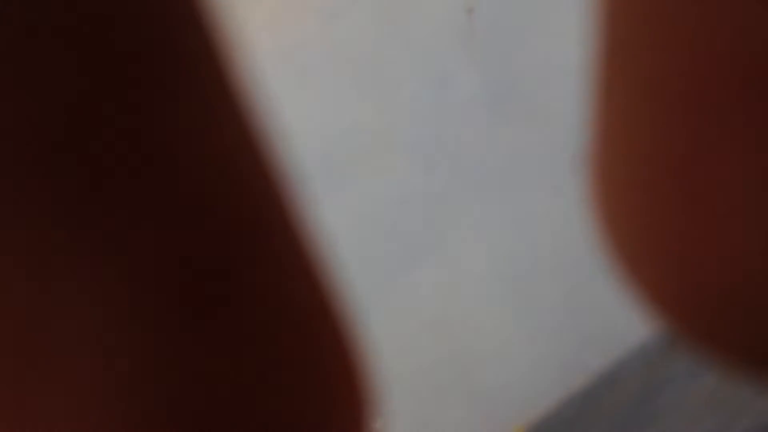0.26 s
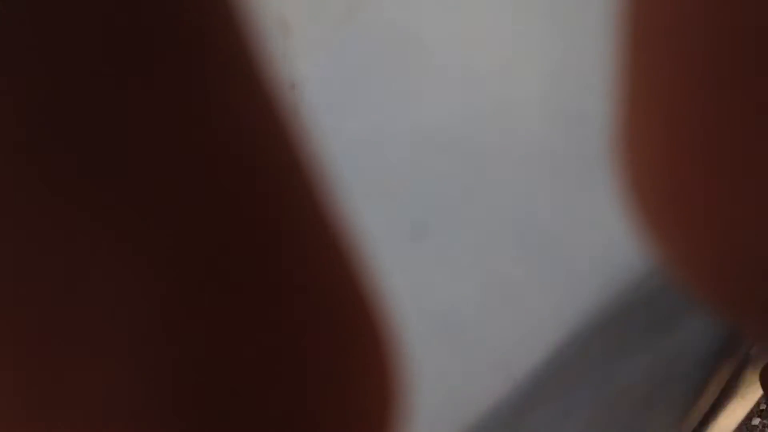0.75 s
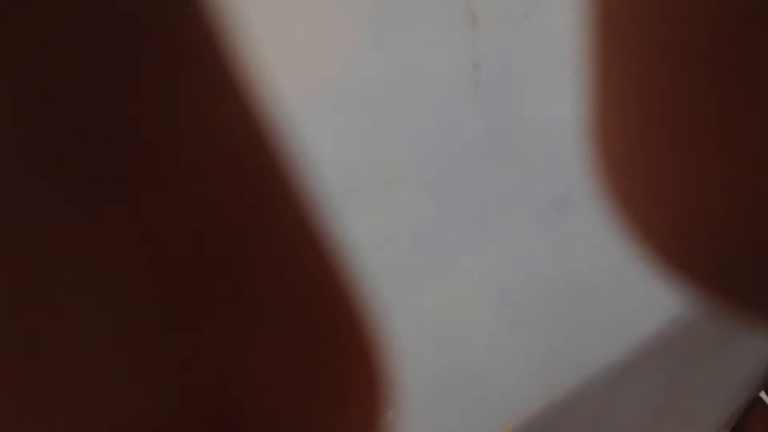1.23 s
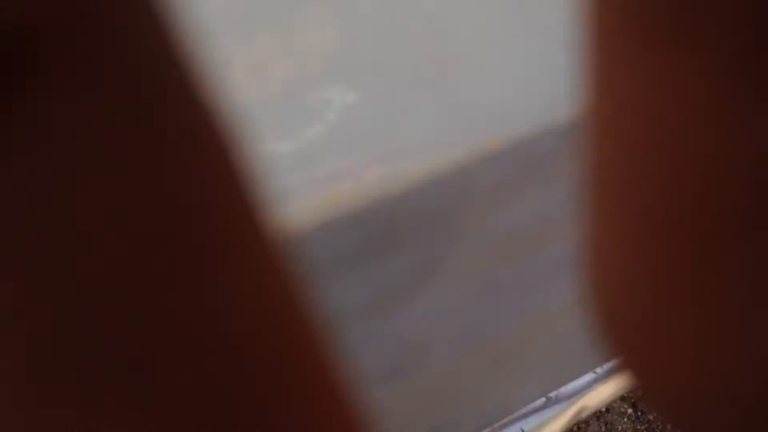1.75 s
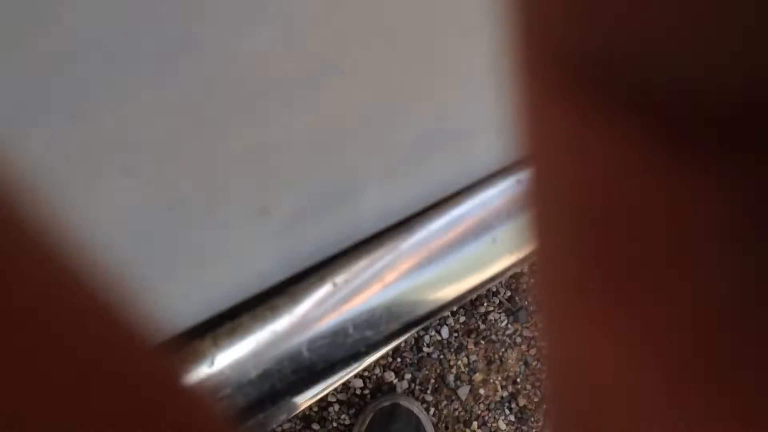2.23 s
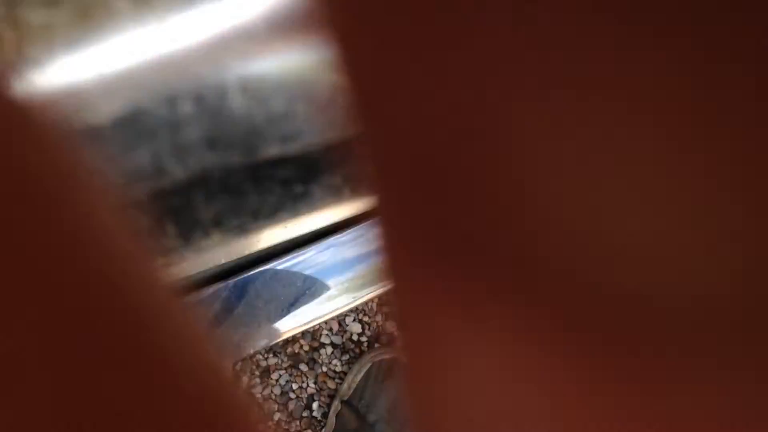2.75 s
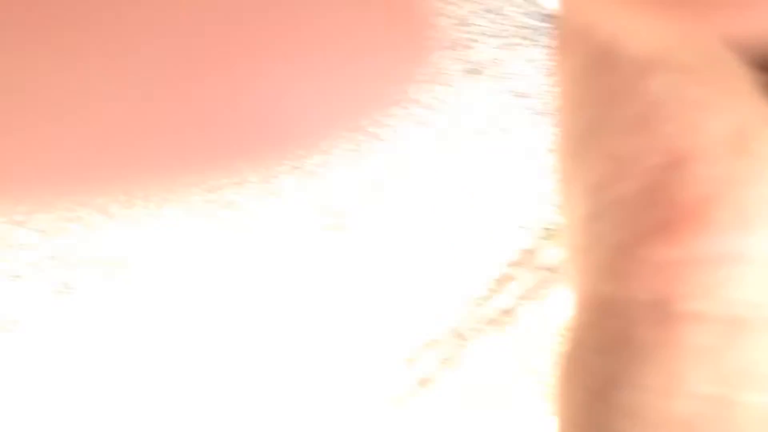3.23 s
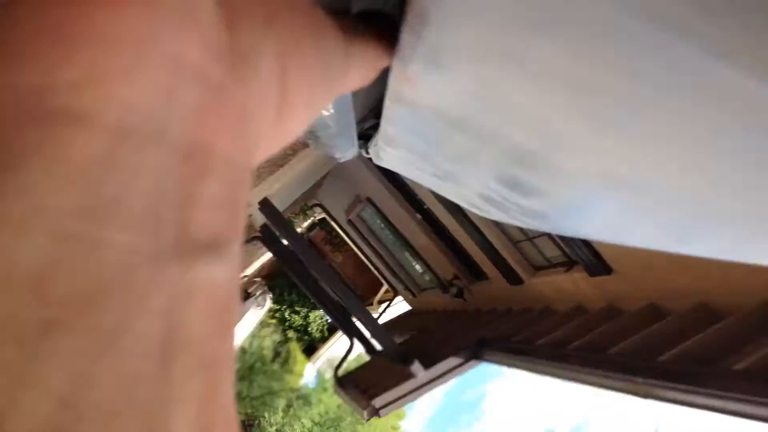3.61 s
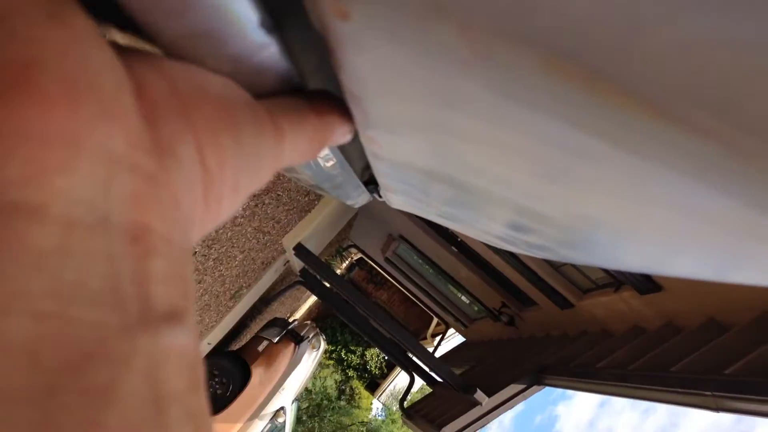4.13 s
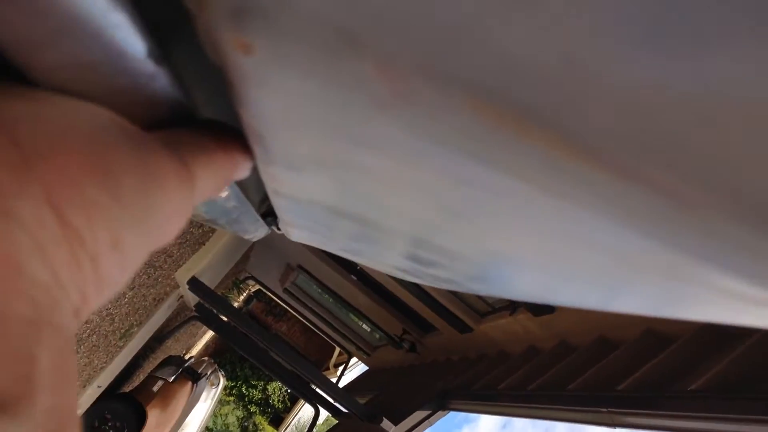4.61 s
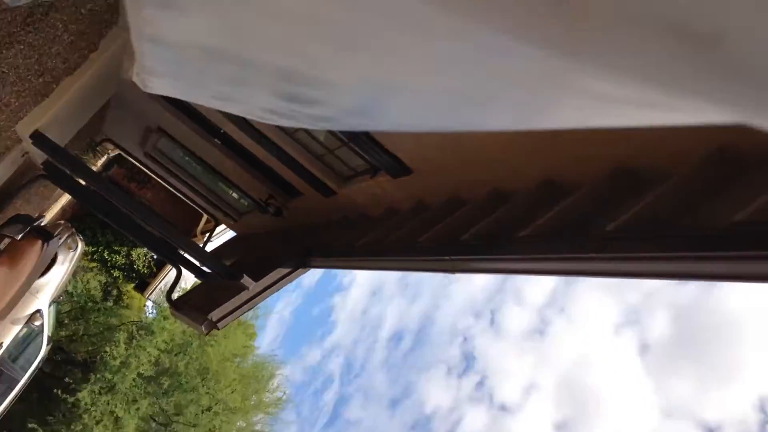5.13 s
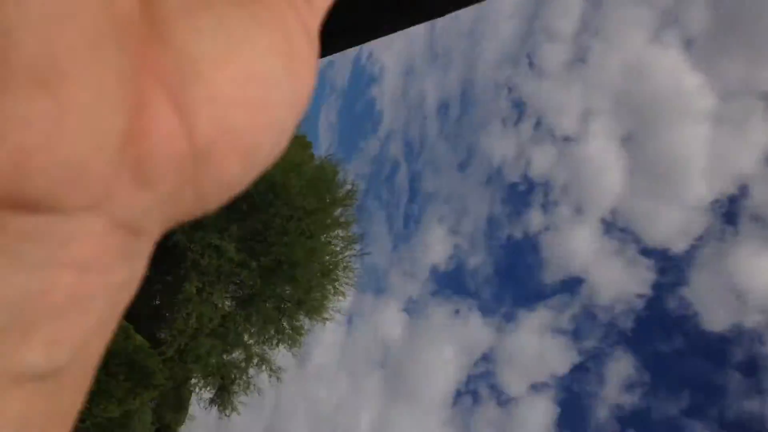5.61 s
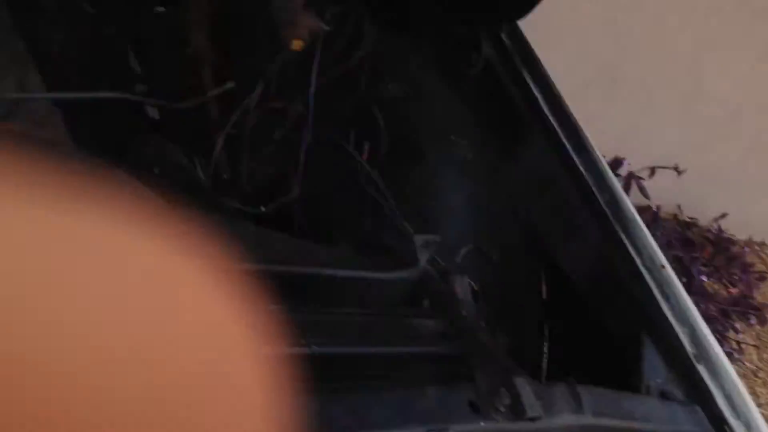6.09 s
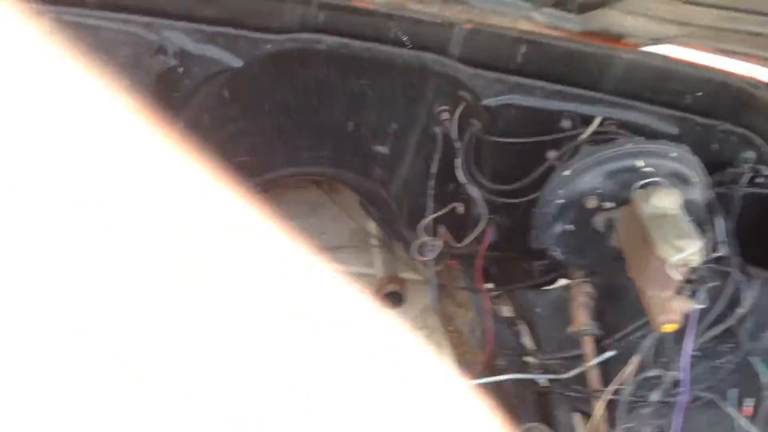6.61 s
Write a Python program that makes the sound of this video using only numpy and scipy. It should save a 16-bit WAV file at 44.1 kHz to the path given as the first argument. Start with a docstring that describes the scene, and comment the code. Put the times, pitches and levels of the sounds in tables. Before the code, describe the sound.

Outdoors, close and dry: fingers rub and scrape on sheet steel while small latch parts tick. One deep double bang shakes the panel early, then comes a calmer stretch of soft rubbing and dull ticks. After the middle, hard metallic cracks, short creaks and resonant booms come irregularly, strongest late as the hood swings up. Rattles and a low throbbing hum fade over a quiet yard rumble and slight hiss.

```python
"""Truck hood and latch

A hand works the latch of a sheet-steel truck hood in a gravel yard, then swings the hood open.
Blows feed a crowd of dense modes, as decaying noise, and low modes, as beating tones: the panel booms.
Hard pushes are tones that fall in pitch, soft landings swelling low tones; small parts tick, snap and ping.
Scrapes and rustle are filtered, grainy noise. An outdoor rumble and microphone hiss lie under all of it."""
import sys
import numpy as np
from scipy import signal
from scipy.fft import rfft, irfft, next_fast_len
from scipy.io import wavfile
from scipy.ndimage import map_coordinates

SR = 44100
rng = np.random.default_rng(int(sys.argv[2]) if len(sys.argv) > 2 else 0)


def put_to_file(sound):
    """Save the sound as 16-bit audio at rate SR, in the file named by the first command-line argument."""
    columns = np.atleast_2d(sound).T  # one column per channel
    safe = np.clip(columns, -1, 1)
    whole_steps = np.round(safe * 32767)
    wavfile.write(sys.argv[1], SR, whole_steps.astype(np.int16))


N = 302123  # length in samples

# blows and short scrapes on the hood: start_s, heave_db (whole hood), boom_db (panel), clang_db (metal contact),
# hardness_db_per_octave (extra treble tilt), contact_s, ring (0-1, scales the decay times)
BLOWS = [(.381, -45, -107, -40.5, 4, 0.005, 0.54), (0.551, -25.5, -24.5, -42, 8, 0.0049, 0.8),
         (0.651, -74, -39, -43, 1, 0.049, 0.92), (0.716, -22, -33.5, -64, -2, 0.0081, 0.68),
         (1.132, -40, -39, -54, 0.5, 0.041, 0.9), (1.174, -16, -11.5, -27.5, -1, 0.0042, 0.63),
         (1.184, -2, -14, -20.5, 1, 0.013, 0.55), (1.272, -34, -21, -51, -13, 0.0086, 0.59),
         (1.535, -13.5, -50, -68, -10.5, 0.02, 0.1), (1.709, -53, -49, -47.5, 2.5, 0.015, 0.42),
         (1.864, -22.5, -38, -51, 1.5, 0.007, 1), (1.964, -37, -40, -52, 6.5, 0.0041, .99),
         (3.439, -34.5, -21, -44, 0.5, 0.064, 0.56), (3.463, -39.5, -13, -27, -2.5, 0.015, 0.62),
         (3.585, -73.5, -22, -48.5, -6.5, 0.028, 0.6), (3.712, -47, -21, -43.5, -9, 0.0097, 0.74),
         (3.983, -75.5, -28, -39.5, 3.5, 0.015, 0.48), (4.088, -80.5, -35.5, -46.5, 2.5, 0.0076, 0.8),
         (4.243, -30.5, -18, -43.5, 2.4, 0.0077, 1), (4.576, -61.5, -38, -38.5, 5, 0.0063, 0.97),
         (4.8117, -12, -14.5, -34.5, 0.5, 0.017, 1), (4.885, -47, -14, -36.5, -10.5, 0.049, 0.48),
         (4.949, -35.5, -12, -52, -23.5, 0.0043, 0.64), (5.152, -49, -34.5, -38, -4, 0.0034, 0.9),
         (5.357, -26.5, -15, -40, -1.5, 0.011, 0.9), (5.369, -17, -3.5, -21.5, 0.5, 0.03, 1),
         (5.431, -23, -10.5, -35, 4, 0.0079, 1), (5.568, -19.5, -8.5, -41.5, -2.5, 0.0025, 0.45),
         (5.669, -40, -21, -69, 10, 0.0031, 0.45), (6.011, -41, -50, -58.5, -0.5, 0.018, 1),
         (6.078, -58.5, -30.5, -59, 2, 0.012, 0.4)]
# low panel modes: pitch_hz, level_db (over the blow's colour), t60_s (at ring 1)
PANEL_MODES = [(73.4, 0, 0.86), (111.3, -13, 0.8), (136.3, 7.5, 0.5), (159.1, 8, 0.8), (183.7, -5.5, 1.3),
               (210.2, 3, 0.93), (225.3, -3, 0.81), (260, 0.5, 0.79), (274, -7, 0.49), (307.3, -3, 0.83),
               (353.6, -2, 1.02), (378.7, -1, 0.51), (418, 1, 0.47), (457.3, -5.5, 0.33), (516, -3, 0.61),
               (651, -7.5, 0.27)]
# stiffer upper modes: centre_hz, width_hz (before blur), level_db (before random spread)
RIBS = [(649.4, 1.5, 1.5), (806, 17, -5), (879.4, 6.1, 1.5), (996, 13, -7.5), (1055, 11, -4.5),
        (1153, 13, -7.5), (1288, 6.9, -1), (1516, 24, -1), (1716, 11, 2), (1950, 92, -0.5), (2192, 63, 2.5),
        (2450, 48, -2.5), (2510, 18, -5.5), (2727, 21, -1), (3023, 57, -4.5), (3334, 45, -2.5),
        (3650, 23, -2), (4100, 230, -9), (4476, 66, -5.5), (5320, 130, -10.5)]
# how fast the dense modes die: freq_hz, t60_s (slow decay at ring 1)
DAMPING = [(50, 0.2), (130, 2.7), (350, 1.11), (920, 0.49), (2400, 0.51), (6400, 0.26), (14000, 0.085)]
# colour of a contact of average hardness: freq_hz, level_db (over the clang)
CLANG = [(1050, 7), (2700, -1.06), (7000, -9)]
# colour between the parts of a blow: freq_hz, boom_share (0-1), offset_db
BETWEEN = [(136.6, 0.64, -3.5), (460.5, 0.61, -1), (690, 0.31, -1)]
# small parts tick: start_s, level_db (before the rise), pitch_hz
TICKS = [(.008, -35, 1350), (.045, -34, 1320), (.071, -32, 1670), (.105, -39, 1370), (.196, -39, 1510),
         (0.219, -37.5, 1640), (.906, -34.5, 1737), (0.929, -36.5, 1730), (0.957, -31, 1040),
         (1.029, -31.5, 1548), (1.494, -44, 1780), (1.531, -38, 1489), (1.847, -46, 1400),
         (1.862, -34.5, 2150), (2.043, -34, 1700), (2.174, -42, 1210), (2.496, -31.5, 1200),
         (2.588, -45, 1250), (2.618, -23, 1170), (2.667, -22.5, 1170), (2.966, -36.5, 1270),
         (3.864, -33, 1360)]
# a small loose metal part jingles: start_s, level_db (before the rise), pitch_hz
PINGS = [(1.96, -59, 7000), (1.967, -71, 5780), (1.978, -63, 6950), (2.038, -61, 8700), (2.04, -62, 6600),
         (2.048, -53, 5800), (2.08, -62, 6600), (2.15, -60, 8650), (2.238, -61, 8740), (2.385, -52, 2880)]
# bright snaps of bare steel: start_s, level_db (before the filter), centre_hz
SNAPS = [(.5512, -30, 4500), (3.465, -25.5, 5500), (3.9582, -19, 5290), (4.2505, -29, 3800),
         (4.5787, -27.5, 7000), (5.154, -33, 3000), (5.3688, -23, 5930)]
# the panel lands softly on a rubber stop: start_s, peak_db, pitch_hz
THUNKS = [(0.552, -15.5, 216), (1.183, -5, 223), (1.1955, -12, 235), (1.277, -12, 120),
          (4.2481, -11.5, 247), (4.953, -11, 299), (5.365, -2.5, 180), (5.379, -6, 386),
          (5.565, -11.5, 237)]
# hard pushes as the latch seats: start_s, level_db, pitch_hz (near the start), t60_s (of the tone), lowpass_hz
KNOCKS = [(1.1745, -16, 520, .03, 2500), (3.4648, 0, 850, .022, 7000), (3.7128, -5, 680, .045, 2300),
          (5.4335, -3, 380, .025, 2500)]
# fingers slip: start_s, level_db, centre_hz, length_s (of the fade)
BRUSHES = [(0.642, -54, 7500, 0.03), (0.785, -57, 10500, 0.078), (0.854, -60, 9880, 0.063),
           (.92, -61, 11550, 0.038), (2.034, -55, 2960, 0.047), (2.318, -56, 2780, 0.1),
           (2.941, -57, 2320, 0.21), (3.162, -60.5, 4000, 0.049), (3.278, -56.5, 2500, 0.14),
           (3.587, -53, 5000, 0.039), (4.015, -58.5, 6500, 0.088), (5.887, -59, 5300, 0.049),
           (6.048, -56.5, 2930, 0.029), (6.1574, -57.5, 3090, 0.043), (6.311, -64.5, 4350, 0.08),
           (6.528, -66, 3180, 0.11)]
# latch steel squeaks and scrapes as it slides: start_s, end_s, centre_hz, width_hz, level_db (before the fade)
CREAKS = [(0.553, 0.575, 1650, 280, -34), (.551, .58, 3070, 1300, -31.5), (.565, 0.641, 3100, 890, -40.5),
          (.655, .69, 3900, 360, -51), (.57, .64, 1250, 1200, -42), (.551, .59, 4800, 690, -44.5),
          (.64, .7, 1450, 1200, -49), (.655, .69, 2800, 110, -44), (.712, .75, 2550, 34, -50.5),
          (1.185, 1.33, 2870, 1700, -37), (1.178, 1.31, 439, 80, -22.5), (3.985, 4.045, 1530, 400, -39.5),
          (3.985, 4.045, 730, 320, -38), (3.985, 4.06, 4300, 1200, -51.5), (4.08, 4.15, 2650, 1300, -55.5),
          (4.882, 5.0, 1330, 280, -29), (4.886, 4.96, 810, 270, -23), (4.89, 4.985, 2460, 1000, -39.5),
          (4.99, 5.11, 760, 620, -41), (5.18, 5.3, 1080, 470, -41.5), (3.47, 3.58, 2230, 570, -40.5),
          (3.47, 3.52, 4200, 2800, -45), (3.466, 3.55, 830, 560, -36.5), (3.58, 3.66, 1250, 1100, -51),
          (3.435, 3.465, 600, 860, -50), (.65, .73, 1490, 530, -41), (4.05, 4.18, 800, 230, -43.5),
          (5.152, 5.185, 3020, 1100, -40), (3.466, 3.62, 1285, 32, -36), (4.244, 4.32, 980, 300, -37),
          (4.249, 4.31, 3150, 2300, -44), (4.25, 4.36, 250, 93, -29.5), (1.186, 1.22, 1950, 120, -25),
          (4.248, 4.285, 2050, 500, -31), (4.249, 4.285, 4320, 400, -51), (4.27, 4.36, 1620, 1000, -41),
          (4.82, 4.867, 2080, 420, -30.5), (3.962, 3.99, 1300, 1500, -53), (6.404, 6.72, 2020, 600, -67.5),
          (2.15, 2.68, 1050, 130, -59.5), (2.2, 2.45, 3080, 300, -65.5), (1.87, 2.57, 1830, 45, -61.5),
          (0, 0.098, 1470, 620, -52.5), (.53, .556, 1400, 4600, -49.5), (3.714, 3.79, 550, 1800, -46),
          (4.23, 4.25, 2600, 1900, -53.5), (1.128, 1.16, 1440, 270, -49.5)]
# hands and shoes rub: time_s, grit_db, swish_db, hollow_db
RUSTLE = [(0.0, -71, -67, -63.5), (0.44, -67, -67.5, -66), (0.72, -56.5, -65.5, -52.5),
          (1.03, -64, -67, -57.5), (1.26, -74, -67.5, -54.5), (1.72, -69, -67.5, -59.5),
          (2.19, -61, -64.5, -52.5), (2.76, -65, -66.5, -61.5), (3.39, -69.5, -64.5, -61.5),
          (3.64, -57, -59.5, -50), (3.81, -63, -61, -59.5), (4.23, -64, -67, -52), (4.41, -65.5, -65, -53),
          (4.66, -77, -67.5, -64.5), (4.88, -47.5, -59.5, -53), (5.0, -57, -61, -46.5),
          (5.44, -60, -64, -53.5), (5.67, -72.5, -73, -57.5), (6.12, -74.5, -69, -70.5),
          (6.85, -73, -70, -68)]
# spectra of the rustle's hollow, gritty and swishing registers: freq_hz, level_db (per Hz)
HOLLOW = [(300, -16), (700, 4), (1500, 4.5), (2400, -7), (3200, -10), (5000, -29.5)]
GRIT = [(1500, -20), (2600, -6.5), (4200, -1), (6000, -9.5), (9000, -20.5)]
SWISH = [(3500, -23), (6000, -3.5), (9000, -5.5), (14000, -7.5), (16000, -5)]
# spectra of the yard's rumble (before the hood colours it) and of the microphone hiss: freq_hz, level_db (per Hz)
YARD = [(12, -47), (20, -12.5), (54, -1), (118, 2.5), (179, 0), (215, -2), (325, -4.5), (414, -9.5),
        (560, -11.5), (800, -29.5), (1320, -120)]
HISS = [(180, -30), (300, 1), (384, -8.5), (675, -8.5), (1590, -3), (2940, -13), (3640, -10.5),
        (14400, -25), (15600, -29.5)]
# loudness of the yard's rumble, before its lumps: time_s, level_db
HUM = [(0, -56), (.4, -58), (2.8, -50.5), (4.6, -55), (5.3, -41), (5.85, -45.5), (6.2, -50.5), (6.5, -56.5),
       (6.85, -55.5)]

HEAVE_HZ, BOOM_HZ, CLANG_HZ = 70, 240, 2700  # heave and boom are centred here; the treble tilt pivots on the clang
WIDTH = 1.2  # each range of the colour is flat within this factor of its centre
CROWD_DB, TONES_DB = 36.5, -13.5  # dense modes and separate low modes, over the level of the blow
ATTACK_S, ATTACK_SHARE = 0.00086, 0.23  # rise time constant of a blow: this plus this share of its contact
MODE_SPREAD_DB = 2.5  # a low mode's strength varies from blow to blow
TWIN, TWIN_APART = .55, .03  # gain and random detune (share of pitch) of the twin that makes a low mode throb
RIB_SPREAD_DB, RIB_SHIFT = 4, .012  # a rib answers each blow at a new strength and a little off its pitch
# what goes on after a blow: level over the blow, rise time constant, decay
SHAKE_DB, SHAKE_RISE_S, SHAKE_T60_S = -17, 0.072, 1.26  # the truck body
SHAKE_BOOM = 0.17  # the body's drive in dB: this share of the boom, the rest from the heave
SWAY_DB, SWAY_RISE_S, SWAY_T60_S = -20, 0.017, 0.99  # the hood on its hinges, fed by the heave
SWAY_REST_DB = -63  # the sway's steady floor
RATTLE_DB, RATTLE_RISE_S, RATTLE_T60_S = -13.5, 0.019, 0.71  # loose latch parts, fed by the clang
TICK_T60_S, PING_T60_S, THUNK_RISE_S = 0.0098, 0.066, 0.0046
CREAK_SKEW, CREAK_FADE_DB = 0.43, 4  # under 1 a scrape peaks early; it loses this much from start to end
LUMPS_DB, LUMPS_PER_S = 2.2, 12  # uneven swell of the rumble
HISS_DB, TOP_HZ = -67, 15780  # TOP_HZ is the band limit


def amp(db):
    """Gain of a level in dB."""
    return 10 ** (np.asarray(db) / 20)


def unit(x):
    """Scaled to rms 1."""
    return x / np.sqrt(np.mean(x ** 2) + 1e-20)


def along(points, hz):
    """Read a curve of (Hz, value) points on a log frequency axis."""
    f, v = np.transpose(points)
    return np.interp(np.log(hz + 1), np.log(f + 1), v)


def curves(rows):
    """One value per sample for each column after the time."""
    s, *cols = np.transpose(rows)
    return [np.interp(np.arange(N) / SR, s, c) for c in cols]


def wobble(rate):
    """A smooth random curve, rate knots a second."""
    knots = rng.standard_normal(int(N * rate / SR) + 4)
    return map_coordinates(knots, [np.arange(N) * rate / SR])


def chatter(count, rate, spread_db):
    """Random gain of loose parts bouncing, straight lines between rate knots a second."""
    knots = rng.standard_normal(count * rate // SR + 2)
    gain_db = spread_db * np.interp(np.arange(count) * rate / SR, np.arange(len(knots)), knots)
    return unit(amp(gain_db))


def filtered(x, response):
    """x shaped by a response of frequency, with padding for the tail."""
    m = next_fast_len(len(x) + 8192)
    return irfft(rfft(x, m) * response(np.fft.rfftfreq(m, 1 / SR)), m)[:len(x)]


def hump(f, hz, width_hz):
    """Shape of one resonance, 1 at its centre."""
    return 1 / (1 + (2 * (f - hz) / width_hz) ** 2)


def ribs(f, spread_db, blur_hz):
    """The upper modes over a floor, at a new strength and pitch as the grip shifts; a hand on the steel widens them."""
    response = 0.39
    for (hz, width_hz, db), (a, b) in zip(RIBS, rng.standard_normal((len(RIBS), 2))):
        response = response + amp(db + spread_db * a) * hump(f, hz * (1 + RIB_SHIFT * b), width_hz + blur_hz)
    return response


def noise(spectrum, grain_db, steel=False):
    """Coloured noise of rms 1, broken into grains by fast random gain; it may sound through the steel."""
    grains = amp(grain_db * wobble(330)) * rng.standard_normal(N)

    def colour(f):
        body = ribs(f, spread_db=0.5, blur_hz=60) if steel else 1
        return amp(along(spectrum, f)) * body
    return unit(filtered(grains, colour))


def add(track, s, sound):
    """Mix a sound into the track at s seconds."""
    part = track[round(s * SR):][:len(sound)]
    part += sound[:len(part)]


def aftermath(levels_db, rise_s, t60_s):
    """Gain that swells after every blow, scaled by its level, and dies away; overlaps add as power."""
    power, t = np.zeros(N), np.arange(N) / SR
    shape = ((1 - np.exp(-t / rise_s)) * amp(-60 * t / t60_s)) ** 2
    for s, db in zip(np.transpose(BLOWS)[0], levels_db):
        add(power, s, amp(2 * db) * shape)
    return np.sqrt(power)


def yard():
    """Low rumble of the yard and the shaking truck body, in lumps and partly through the hood, over steady hiss."""
    def hood_modes(f):
        return 2.1 + sum(amp(db) * hump(f, hz, width_hz=11.0) for hz, db, _ in PANEL_MODES)
    rumble = unit(filtered(noise(YARD, grain_db=1.0), hood_modes))
    # the heavy body shakes lower than the yard hums
    dark = unit(filtered(rumble, lambda f: hump(f, hz=138, width_hz=640)))
    heave_db, boom_db = np.transpose(BLOWS)[1:3]
    drive_db = SHAKE_BOOM * boom_db + (1 - SHAKE_BOOM) * heave_db
    shake = aftermath(drive_db + SHAKE_DB, SHAKE_RISE_S, SHAKE_T60_S)
    lumps = amp(LUMPS_DB * wobble(LUMPS_PER_S))
    hiss = amp(HISS_DB) * noise(HISS, grain_db=3.5)
    return lumps * (amp(curves(HUM)[0]) * rumble + shake * dark) + hiss


def sway():
    """The hood's lowest mode, shaken at random after every heave, hums and throbs over a faint steady floor."""
    hum = unit(filtered(rng.standard_normal(N), lambda f: hump(f, hz=75.5, width_hz=14.0)))
    swell = aftermath(np.transpose(BLOWS)[1] + SWAY_DB, SWAY_RISE_S, SWAY_T60_S)
    return (amp(SWAY_REST_DB) + swell) * hum


def rustle():
    """Skin on steel and soles on gravel: gritty noise in three registers that flutter together; loose parts rattle on."""
    grit_db, swish_db, hollow_db = curves(RUSTLE)
    rattle = aftermath(np.transpose(BLOWS)[3] + RATTLE_DB, RATTLE_RISE_S, RATTLE_T60_S)
    flutter = amp(1.14 * wobble(24.97))
    hollow = np.hypot(amp(hollow_db), rattle) * noise(HOLLOW, grain_db=2.0, steel=True)
    grit = amp(grit_db + 1.2 * wobble(70)) * noise(GRIT, grain_db=1.5, steel=True)
    swish = amp(swish_db + 1.2 * wobble(60)) * noise(SWISH, grain_db=0.5)
    return flutter * (hollow + grit + swish)


def creaks():
    """Thin squeaks of steel on steel: narrow noise through the upper modes, in chattering grains."""
    out = np.zeros(N)
    for start, end, hz, width_hz, db in CREAKS:
        raw = rng.standard_normal(round((end - start) * SR))
        thin = unit(filtered(raw, lambda f: hump(f, hz, width_hz) * ribs(f, spread_db=3.0, blur_hz=25)))
        done = np.linspace(0, 1, len(thin))  # share of the slide
        grains = chatter(count=len(thin), rate=250, spread_db=3)
        arc = np.sin(np.pi * done ** CREAK_SKEW) ** 0.26 * np.sqrt(1 - done ** 3)
        add(out, start, amp(db - CREAK_FADE_DB * done) * thin * grains * arc)
    return out


def struck_parts(table, t60_s):
    """Small struck parts: each a decaying sine with a very quick rise."""
    out, t = np.zeros(N), np.arange(SR // 10) / SR
    for s, db, hz in table:
        envelope = amp(db - 60 * t / t60_s) * (1 - np.exp(-t / 0.00038))
        add(out, s, envelope * np.sin(2 * np.pi * hz * t))
    return out


def ticks():
    """Well-damped small parts give only a few cycles each."""
    return struck_parts(TICKS, TICK_T60_S)


def colour_of(heave_db, boom_db, clang_db, hardness):
    """Spectrum of one blow, (Hz, dB): heave, boom and a contact whose treble tilts up with hardness."""
    top = [(hz, clang_db + db + hardness * np.log2(hz / CLANG_HZ)) for hz, db in CLANG]
    between = []
    for hz, share, db in BETWEEN:
        neighbour_db = heave_db if hz < BOOM_HZ else top[0][1]
        between.append((hz, share * boom_db + (1 - share) * neighbour_db + db))
    centres = sorted([(HEAVE_HZ, heave_db), (BOOM_HZ, boom_db), *between, *top])
    plateaus = [(hz * side, db) for hz, db in centres for side in (1 / WIDTH, WIDTH)]
    return [(25, heave_db - 21.5), *plateaus, (16000, top[-1][1] - 19.5)]


def dense_modes(colour, contact, ring, count):
    """The crowd of dense modes, heard as noise with a fast and a slow decay for each frequency."""
    rattle = chatter(count, rate=400, spread_db=2.5) * rng.standard_normal(count)
    hz, frames, z = signal.stft(rattle, SR, nperseg=256)
    after = np.maximum(frames - contact, 0) / (ring * along(DAMPING, hz)[:, None])
    decay = amp(-60 * after) + 1.206 * amp(-60 * after * 2.0)
    crowd = signal.istft(z * decay, SR, nperseg=256)[1][:count]

    def steel(f):
        upper_modes = ribs(f, spread_db=RIB_SPREAD_DB, blur_hz=4.2)
        return amp(along(colour, f) + CROWD_DB) * upper_modes / np.sqrt(f + 250)
    return filtered(crowd, steel)


def low_modes(colour, contact, ring, t):
    """The lowest modes stand apart as tones, each beating with a weaker twin."""
    after = np.maximum(t - contact, 0) / ring
    tones = np.zeros(len(t))
    for (hz, db, t60), (a, b, c) in zip(PANEL_MODES, rng.standard_normal((len(PANEL_MODES), 3))):
        level_db = along(colour, hz) + db + TONES_DB + MODE_SPREAD_DB * a
        tone = np.sin(2 * np.pi * hz * (1 + 0.0082 * b) * t)
        twin = TWIN * np.sin(2 * np.pi * hz * (1 + TWIN_APART * c) * t + 9 * b)
        tones += amp(level_db - 60 * after / t60) * (tone + twin)
    return tones


def hood():
    """A contact feeds the panel while it lasts; then each frequency dies at its own speed."""
    out, t = np.zeros(N), np.arange(int(1.5 * SR)) / SR
    for s, *parts, contact, ring in BLOWS:
        colour = colour_of(*parts)
        sound = dense_modes(colour, contact, ring, len(t)) + low_modes(colour, contact, ring, t)
        add(out, s, sound * (1 - np.exp(-t / (ATTACK_S + ATTACK_SHARE * contact))))
    return out


def snaps():
    """Bare steel snaps: broad clicks of filtered noise that die within milliseconds."""
    out, t = np.zeros(N), np.arange(SR // 10) / SR
    for s, db, hz in SNAPS:
        click = filtered(rng.standard_normal(len(t)), lambda f: hump(f, hz, width_hz=3000))
        add(out, s, amp(db - 60 * t / 0.007) * click)
    return out


def thunks():
    """A soft contact gives a few cycles of one low mode that swell and fade."""
    out, t = np.zeros(N), np.arange(SR // 10) / SR
    swell = t / THUNK_RISE_S * np.exp(1 - t / THUNK_RISE_S)
    for s, db, hz in THUNKS:
        add(out, s, amp(db) * swell * np.sin(2 * np.pi * hz * t))
    return out


def brushes():
    """Slipping fingers: short puffs of friction noise, quick to rise and slower to fade."""
    out, t = np.zeros(N), np.arange(SR // 3) / SR
    for s, db, hz, length in BRUSHES:
        puff = unit(filtered(rng.standard_normal(len(t)), lambda f: hump(f, hz, width_hz=4600)))
        add(out, s, amp(db) * puff * np.minimum(t / 0.0071, 1) * np.exp(-(t / length) ** 2))
    return out


def knocks():
    """Bending waves in a plate spread out: the high part of a push arrives first, so its pitch falls."""
    out, t = np.zeros(N), np.arange(SR // 10) / SR
    for s, db, hz, t60, lowpass_hz in KNOCKS:
        # the pitch drops within a millisecond or so to 0.26 of the listed one
        cycles = hz * (0.26 * t + 0.5 * 0.00093 * (1 - np.exp(-t / 0.00064)))
        tone = amp(db - 60 * t / t60) * np.sin(2 * np.pi * cycles)
        crack = filtered(rng.standard_normal(len(t)), lambda f: hump(f, hz=1180, width_hz=1100) ** 3)
        crack *= amp(db + 6.5 - 60 * t / 0.01) * np.minimum(t / 0.00062, 1)
        lowpass = signal.butter(4, lowpass_hz, fs=SR, output="sos")
        add(out, s, signal.sosfilt(lowpass, tone + crack))
    return filtered(out, lambda f: f ** 4 / (f ** 4 + 120 ** 4))  # a panel radiates little below its first modes


def pings():
    """A small loose metal part is less damped than the ticking ones, so it rings longer."""
    return struck_parts(PINGS, PING_T60_S)


def scene():
    """All sources at one microphone."""
    background = yard() + sway()
    friction = rustle() + creaks() + brushes()
    small_parts = ticks() + snaps() + pings()
    panel = hood() + thunks() + knocks()
    return (background + friction + small_parts + panel)[None]


def record(dry):
    """The input saturates softly at full scale and nothing passes above the band limit."""
    clipped = dry[0] / (1 + np.abs(dry[0]) ** 8) ** (1 / 8)
    return filtered(clipped, lambda hz: hz < TOP_HZ)[None]


dry = scene()
out = record(dry)
put_to_file(out)
```